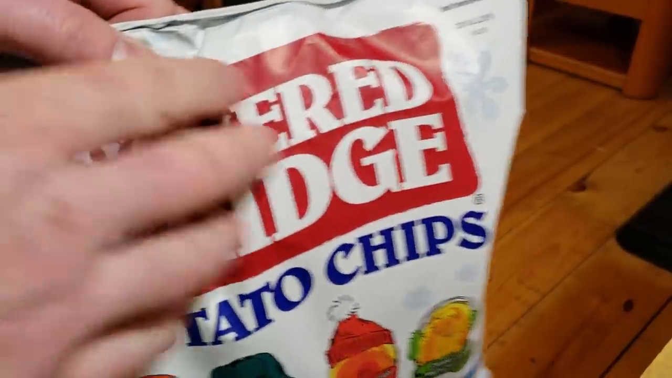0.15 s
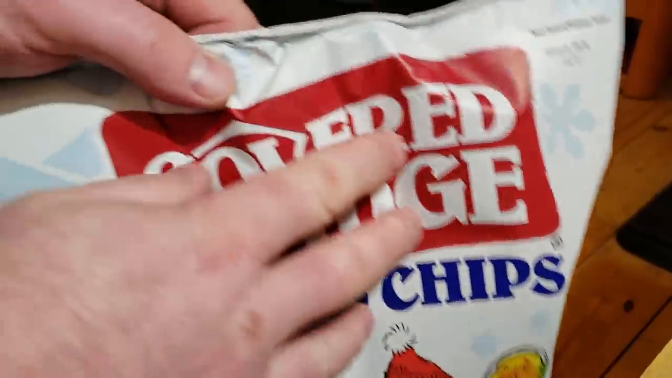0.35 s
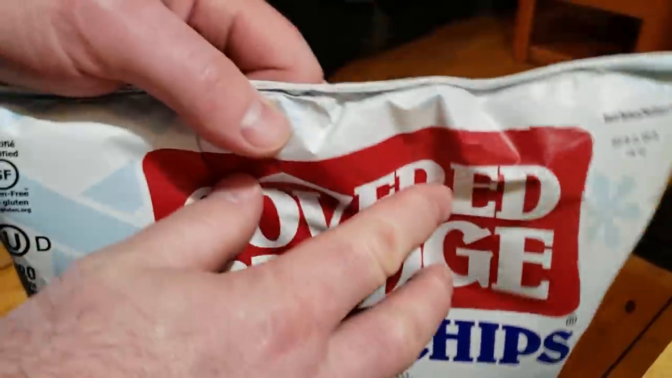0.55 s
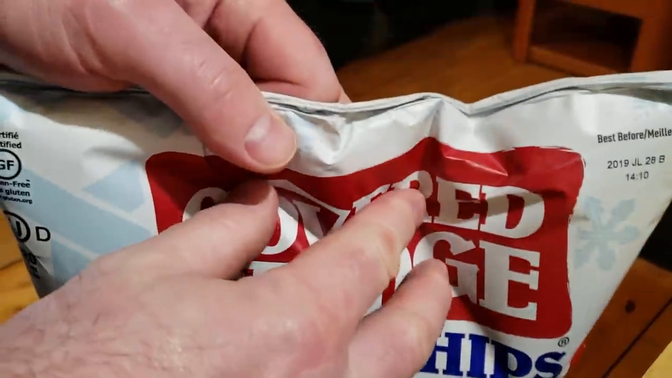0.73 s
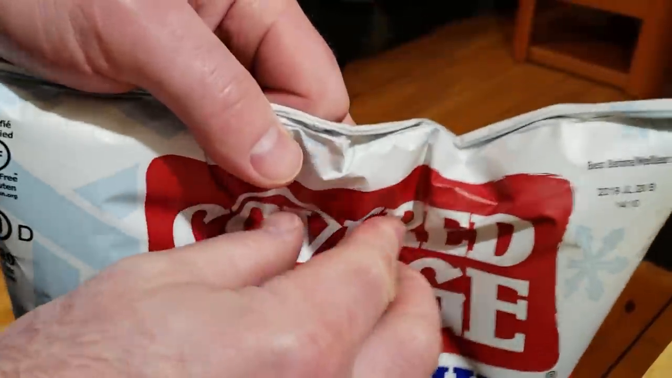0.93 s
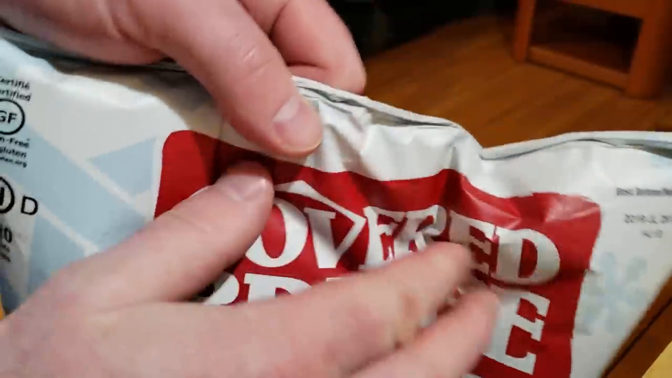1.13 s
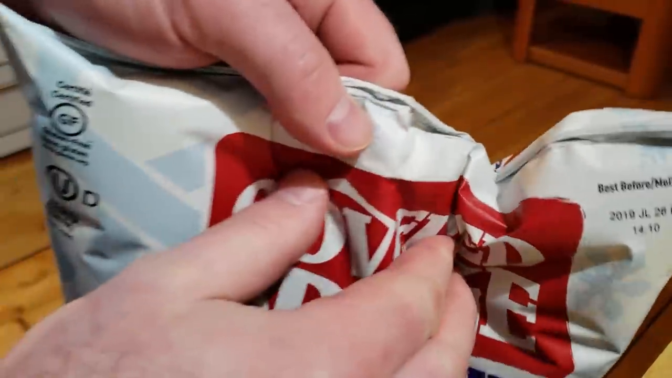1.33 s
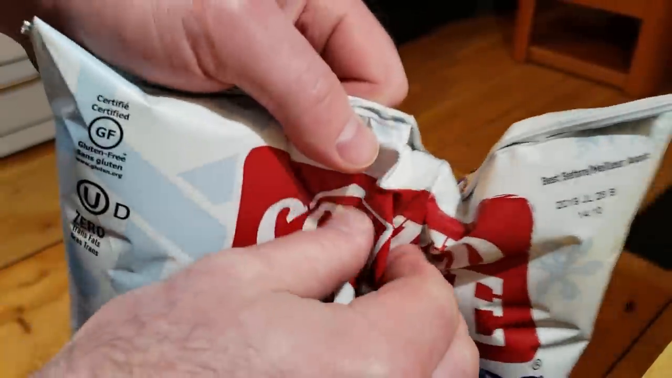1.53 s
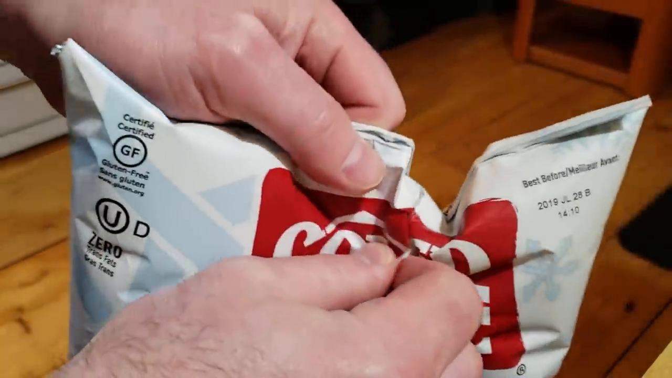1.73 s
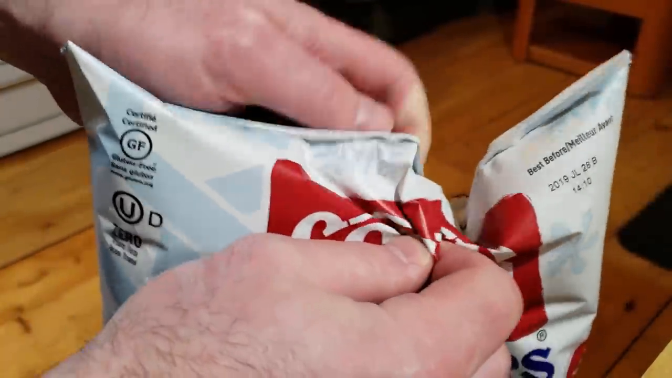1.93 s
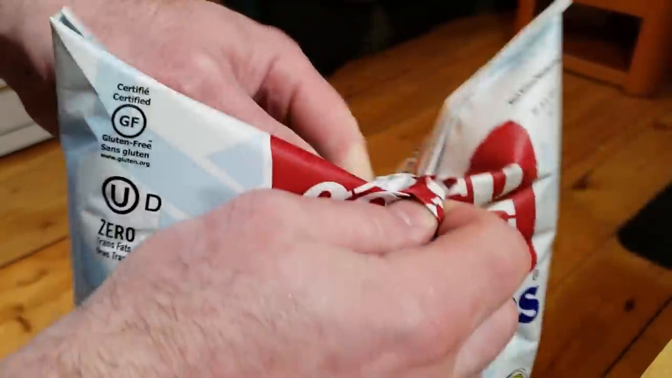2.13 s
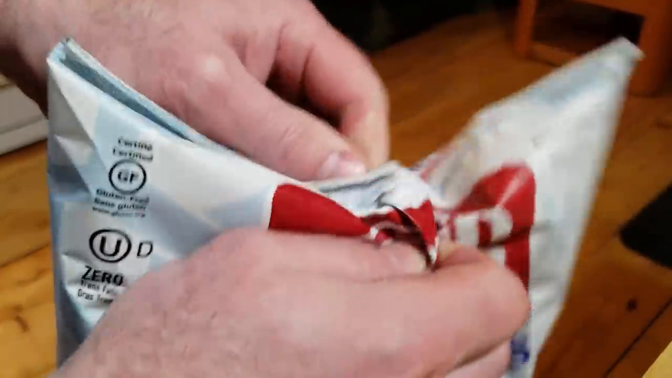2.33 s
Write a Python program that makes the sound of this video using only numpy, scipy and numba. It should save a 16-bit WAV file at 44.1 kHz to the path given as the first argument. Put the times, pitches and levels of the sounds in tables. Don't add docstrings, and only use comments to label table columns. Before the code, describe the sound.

A foil snack bag crinkles sharply under two hands, with bright snaps and fine crackle, up close.

```python
import sys
import numpy as np
from scipy import signal
from scipy.fft import rfft, irfft
from scipy.io import wavfile
from numba import njit

SR = 44100
rng = np.random.default_rng(int(sys.argv[2]) if len(sys.argv) > 2 else 0)


def boost_factor(decibels):
    exponent = np.asarray(decibels, float) / 20
    return 10 ** exponent


def bounce(signal):
    frames = np.transpose(np.atleast_2d(signal))
    limited = np.clip(frames, -1, 1)
    pcm = np.round(limited * 32767).astype(np.int16)
    wavfile.write(sys.argv[1], SR, pcm)


N = 105840

LEAN_DB = -3
CLUSTER_S = .001


def colour(x, points):
    hz, db = np.array(points, float).T
    bins_hz = np.maximum(np.arange(1025) * SR / 2048, 1)
    log_gain = np.interp(np.log(bins_hz), np.log(hz), db) * np.log(10) / 20
    cepstrum = irfft(log_gain)
    cepstrum[1:1024] *= 2
    cepstrum[1025:] = 0
    answer = irfft(np.exp(rfft(cepstrum)))
    return signal.fftconvolve(x, answer[None], axes=1)[:, :N]


@njit
def ring(rows):
    out = np.zeros((2, N))
    for s, hz, cycles, size, pan_db, lag_s in rows:
        turn_and_decay = np.exp((2j * np.pi - 1 / cycles) * hz / SR)
        for ear in range(2):
            side = .5 - ear
            start = max(int((s + side * lag_s) * SR), 0)
            end = min(N, start + int(7 * cycles * SR / hz))
            z = size * 10 ** (side * pan_db / 20) + 0j
            for k in range(start, end):
                z *= turn_and_decay
                out[ear, k] += z.imag
    return out


def cluster(s, db, hz, pan_db, spread_oct, cycles, length_s, count):
    u = rng.random((len(s), count, 3))
    z = rng.standard_normal((len(s), count, 4))

    def column(values):
        return np.asarray(values, float)[:, None] + np.zeros((len(s), count))

    shift = 2 ** (spread_oct * z[..., 0].clip(-2, 2))
    delay = -length_s * np.log((1 - u[..., 0]) * (1 - u[..., 2])) / 2
    pitch = np.clip(column(hz) * shift, 60, 16500)
    decay = cycles * (.5 + u[..., 1])
    share = z[..., 1] * np.sqrt(shift / np.sum(z[..., 1] ** 2, 1, keepdims=True))
    pan = column(pan_db) + 2 * z[..., 2]
    port_lag = .00015 * z[..., 3]
    rows = (column(s) + delay, pitch, decay, boost_factor(column(db)) * share, pan, port_lag)
    return np.stack(rows, -1).reshape(-1, 6)


def still_air():
    air_tone = [
        (40, -34),
        (100, -9),
        (200, -5.5),
        (450, -12),
        (16000, -97),
    ]
    air = rng.standard_normal((1, N)) + 0.22 * rng.standard_normal((2, N))
    air = colour(air, air_tone)
    return boost_factor(-58) * air / np.sqrt(np.mean(air ** 2))


def room(x):
    t60_s, tail_db, earlier_db, top_hz = 0.35, -14.5, -40, 7100
    t = np.arange(N) / SR
    tail = rng.standard_normal((4, N)) * boost_factor(-60 * t / t60_s)
    tail = signal.sosfilt(signal.butter(1, top_hz, fs=SR, output="sos"), tail)
    answer = tail[:2] * np.clip(t / 0.0022, 0, 1)
    answer = answer / np.sqrt(np.sum(answer ** 2, 1, keepdims=True))
    wet = boost_factor(tail_db) * signal.fftconvolve(x, answer, axes=1)[:, :N]
    earlier = boost_factor(earlier_db) * colour(tail[2:], [(600, 15.5), (5000, -1.5)])
    return wet + earlier


def microphone(x):
    mic_tone = [
        (500, -6),
        (1200, -2.5),
        (2600, -1),
        (6770, 4),
        (8860, -2),
        (14800, 7.5),
        (15800, 2),
        (16100, -23),
    ]
    return colour(x, mic_tone)


def puffs():
    air_pushes = [
        (.6, -19, 0.0036, 31),
        (.965, -16.5, 0.0018, -40),
        (1.003, -28, 0.0021, -3),
        (1.085, -17, 0.0037, -30),
        (1.655, -28.5, 0.0052, 0),
        (1.672, -28, 0.015, 0),
        (1.69, -31, 0.014, 1),
        (2.0501, -2.5, 0.0021, -38),
    ]
    t = np.arange(N) / SR
    out = np.zeros((2, N))
    for s, db, length_s, pan_db in air_pushes:
        since = np.clip(t - s, 0, 1)
        rise = 1 - np.exp(-since / (.05 * length_s))
        push = -rise * np.exp(-since / length_s)
        out += boost_factor(db + np.minimum([[pan_db], [-pan_db]], 0)) * push
    return signal.sosfilt(signal.butter(2, 62, "high", fs=SR, output="sos"), out)


def grip():
    grip_points = [(0, -82, -1), (.18, -95, 0), (0.184, -47.5, 10), (.4, -41, 5), (.52, -35, -4),
                   (.67, -45, 11), (.76, -57.5, -4), (.87, -50.5, -27), (1.1, -53, 10), (1.36, -54, 5.5),
                   (1.6, -54.5, -6), (1.85, -50.5, 7.5), (2.05, -37.5, -7.5), (2.25, -51, -6),
                   (2.4, -55, -11)]
    s, busy_db, slack_db = np.array(grip_points).T
    t = np.arange(N) / SR
    return np.interp(t, s, busy_db), np.interp(t, s, slack_db)


def rumble(flutter_db):
    s = np.sort(rng.random(1500)) * N / SR
    db = flutter_db[(s * SR).astype(int)] + 1
    return ring(cluster(s, db, 0 * s + 300, 0 * s - 1.5, 1.11, 1.88, 0.00339, count=2))


def knocks():
    panel_knocks = [(0.2637, -34, 296), (.4045, -26, 343), (.448, -25.5, 340), (0.4987, -28, 220),
                    (0.5584, -31, 507), (0.616, -33, 260), (1.121, -32, 417), (.4765, -28, 200),
                    (.4858, -26.5, 674), (0.245, -32, 222), (0.4367, -23, 603), (.5705, -33.5, 251),
                    (1.5012, -28.5, 1090), (1.7613, -37, 290), (2.118, -39, 416)]
    s, db, hz = np.array(panel_knocks).T
    one_cycle = 0 * s + 1
    return ring(np.c_[s, hz, one_cycle, -boost_factor(db + 11), 0 * s, 0 * s])


def creases():
    # time [s], peak [dB], ring centre [Hz], thump over snap [dB]
    press = [(0.1862, -17, 5370, -20), (0.2443, -12, 4020, -23), (0.2829, -6.5, 4080, -19.5),
             (0.3241, -8, 3740, -13.5), (0.3549, -4, 3890, -20.5), (0.4336, -8, 5080, -9.5),
             (0.4749, -12.5, 5700, -7.5), (0.4842, -3.5, 4220, -17), (0.4938, -5.5, 4860, -22),
             (0.5162, -11, 4800, -7.5), (0.5282, -7.5, 4800, -20), (0.5711, -18, 4070, -4),
             (0.5903, -8.5, 3430, -18.5), (0.6448, -7.5, 4080, -13), (0.6501, -4.5, 4200, -23.5),
             (0.6611, -5.5, 4280, -15.5), (0.713, -22.5, 3300, -20)]
    # the same columns, then left-right [dB]
    pinch = [(0.9056, -19, 4900, -10, 8), (0.9629, -8.5, 6100, -15.5, -5), (1.0017, -8, 6300, -11.5, -6),
             (1.0653, -14, 5200, -12, -2), (1.0843, -6.5, 6260, -29, -3.5), (1.111, -13, 4860, -14, -3),
             (1.1405, -11.5, 4610, -17, -3), (1.2101, -8, 4900, -15, 3), (1.316, -10, 5500, -24.5, -7),
             (1.4289, -12.5, 2180, -17, 0), (1.626, -16, 4800, -25, -8.5), (1.8303, -9.5, 5200, -19, -3),
             (1.9011, -12.5, 4470, -17.5, -3), (2.0035, -13, 4270, -12.5, -2),
             (2.0156, -8, 6500, -21.5, -5.5), (2.0334, -19, 3900, -10, -11), (2.0997, -11, 3830, -15, -3)]
    # time [s], peak [dB], ring centre [Hz]
    crease_ticks = [(0.2351, -14, 2400), (0.2648, -32, 2710), (0.3376, -18, 3570), (0.4054, -18, 4000),
                    (0.4245, -21, 4070), (0.4362, -3.5, 5100), (0.4473, -9, 4850), (0.4862, -0.5, 3700),
                    (0.5543, -14, 3870), (0.6026, -17, 3450), (0.6212, -14, 2830), (0.88, -23, 4900),
                    (0.9167, -18.5, 4630), (0.9705, -30, 3440), (0.9927, -45, 3920), (1.0908, -15, 4500),
                    (1.1215, -20, 4140), (1.1622, -22, 3600), (1.1787, -16, 4540), (1.2455, -15.5, 4780),
                    (1.2554, -16.5, 3750), (1.2816, -21, 3200), (1.3309, -22.5, 5250), (1.3566, -40, 4850),
                    (1.3941, -18, 4120), (1.4156, -24, 5420), (1.5227, -28, 4900), (1.5525, -17, 3660),
                  (1.594, -20.5, 4000), (1.61, -16.5, 4700), (1.659, -16, 4500), (1.6913, -18.5, 4600),
                  (1.736, -17.5, 4800), (1.7734, -21, 4400), (1.8192, -26, 3930), (1.8482, -16.5, 4470),
                  (1.8753, -21, 4600), (1.9068, -16.5, 5000), (1.9151, -11.5, 4660), (1.947, -18.5, 5150),
                  (1.9853, -20, 3160), (2.071, -14.5, 4400), (2.092, -15, 3230), (2.1373, -27, 6100),
                  (2.1951, -22.5, 4600), (2.3058, -17, 5100), (2.3982, -16, 3670)]
    ticks = np.array(crease_ticks)
    thump_db = np.full(len(ticks), -17)
    leaning = np.vstack([press, np.c_[ticks, thump_db]])
    return np.vstack([pinch, np.c_[leaning, np.full(len(leaning), LEAN_DB)]]).T


def cushion():
    # time [s], peak [dB], pitch [Hz]
    dull_folds = [
        (0.336, -24.5, 202),
        (0.37, -26, 162),
        (1.0653, -22, 517),
        (1.5014, -25, 420),
        (1.9173, -29.5, 289),
        (2.0334, -20, 292),
        (2.092, -25, 345),
        (2.2559, -35.5, 627),
    ]
    s, db, _, thump_db, pan = creases()
    fold_s, fold_db, fold_hz = np.array(dull_folds).T
    db = db + thump_db
    air = cluster(s, db - 1.5, 0 * s + 267.3, pan / 3, 0.32, 2, 0.00196, count=6)
    panels = cluster(s, db + 9.5, 0 * s + 905, pan / 2, 0.74, 0.86, 0.00199, count=12)
    folds = cluster(fold_s - CLUSTER_S, fold_db + 7.5, fold_hz, 0 * fold_s - 1.5, .05, 1.4, 0.00023, count=1)
    return ring(np.vstack([air, panels, folds]))


def rustle(grip_db):
    lean = boost_factor([[LEAN_DB / 2], [-LEAN_DB / 2]])
    return boost_factor(grip_db - 3.5) * rng.standard_normal((2, N)) * lean


def crackle(grip_db):
    per_s, scatter_db, top_db = 1000, 4, -37
    u = rng.random((6000, 3))
    s = np.cumsum(-np.log(1 - u[:, 0])) / per_s
    inside = s < N / SR
    s, u = s[inside], u[inside]
    db = grip_db[(s * SR).astype(int)] - scatter_db * np.log(1 - u[:, 1]) + 8.5
    hz = 1200 * 2 ** (3.52 * u[:, 2])
    return ring(cluster(s, np.minimum(db, top_db), hz, 0 * s + LEAN_DB, 0.89, 2.75, .0005, count=6))


def flicks():
    small_flicks = [(0.2646, -21, 3080), (0.3203, -20, 3010), (0.3442, -18, 2570), (0.4667, -9, 7640),
                    (0.5123, -10, 5960), (0.5363, -11, 3500), (0.5711, -13.5, 4630), (0.6301, -15, 3300),
                    (0.634, -9, 5690), (0.6668, -16, 4200), (0.7123, -15.5, 3500), (0.9923, -36, 5650),
                    (1.0402, -21, 5710), (1.0639, -13, 7500), (1.0814, -19, 6070), (1.1163, -23, 6840),
                    (1.1395, -9, 8150), (1.172, -24, 5290), (1.1874, -15.5, 7740), (1.2342, -18, 7600),
                    (1.312, -24, 3520), (1.3303, -21, 7490), (1.356, -32, 4930), (1.466, -24, 5460),
                    (1.5025, -29, 1310), (1.5242, -22.5, 5600), (1.5569, -19.5, 3750), (1.6476, -23, 4860),
                    (1.6592, -28, 6300), (1.7505, -21, 4140), (1.7685, -21, 2500), (1.782, -17.5, 4810),
                    (1.7912, -24.5, 3300), (1.816, -16, 4600), (1.857, -30, 6270), (1.8833, -25, 5100),
                    (2.0122, -22, 5240), (2.0443, -16, 5730), (2.0504, -13.5, 2250), (2.058, -16, 8120),
                    (2.0816, -17, 7700), (2.0897, -16, 5000), (2.1371, -13.5, 6030), (2.1466, -11, 6100),
                    (2.1678, -23, 8080), (2.1883, -17.5, 3070), (2.1926, -21, 5000), (2.222, -23, 10050),
                    (2.252, -22.5, 7140), (2.2563, -21, 3320), (2.2625, -21, 7600), (2.2691, -26, 8010),
                    (2.276, -18, 10400), (2.294, -26, 8220), (2.3095, -22, 3500), (2.3521, -22, 10000)]
    s, db, hz = np.array(small_flicks).T
    pan = 0 * s + LEAN_DB
    tight = cluster(s, db + 4.5, hz, pan, 0.24, 0.67, .0003, count=5)
    crack = cluster(s, db - 1.5, 0 * s + 9000, pan, 0.41, 1.0, 0.0004, count=12)
    return ring(np.vstack([tight, crack]))


def snaps():
    s, db, hz, _, pan = creases()
    early = s - .0004
    db = db - 1.5
    creak = cluster(early, db - 15.5, hz, pan, 1.1, 1.2, -.003, count=24)
    spike = cluster(s, db + 2, 1.084 * hz, pan, 0.46, 0.56, .0001, count=4)
    crack = cluster(early, db + 2, 0 * hz + 11000, pan, 0.574, 1.86, 0.00045, count=24)
    rings = cluster(early, db, hz, pan, 0.549, 2.13, CLUSTER_S, count=12)
    after = cluster(early, db + 2, 0 * hz + 5500, pan, 1.063, 1.0, 0.0043, count=80)
    return ring(np.vstack([creak, spike, crack, rings, after]))


def scene():
    grip_db, slack_db = grip()
    low = rumble(grip_db + slack_db) + knocks() + cushion()
    low = signal.sosfilt(signal.butter(4, 85, "high", fs=SR, output="sos"), low)
    foil = rustle(grip_db) + crackle(grip_db) + flicks() + snaps()
    bag = foil + low
    return still_air() + puffs() + microphone(bag + room(bag))


def top_cut(x):
    return signal.sosfilt(signal.butter(12, 16840, fs=SR, output="sos"), x)


def record(dry):
    mix = np.tanh(dry)
    return top_cut(mix)


dry = scene()
out = record(dry)
bounce(out)
```